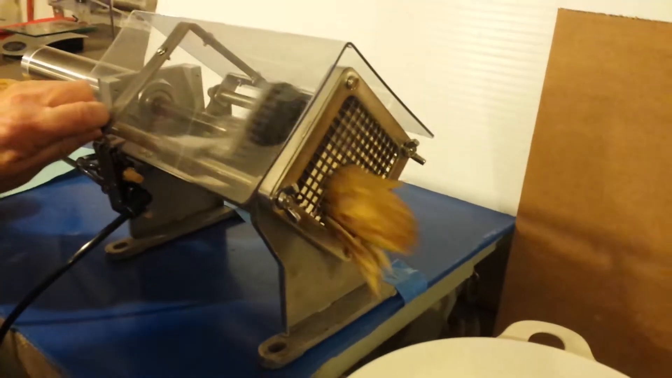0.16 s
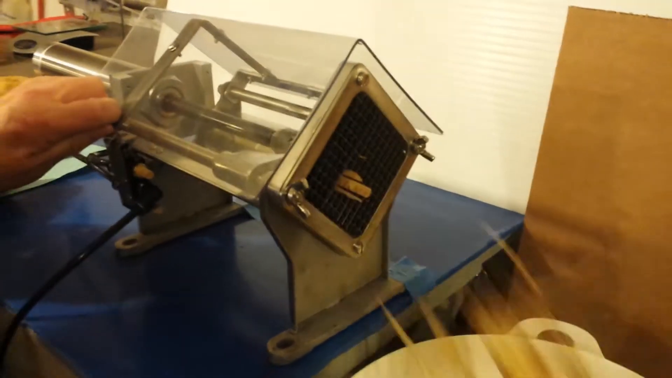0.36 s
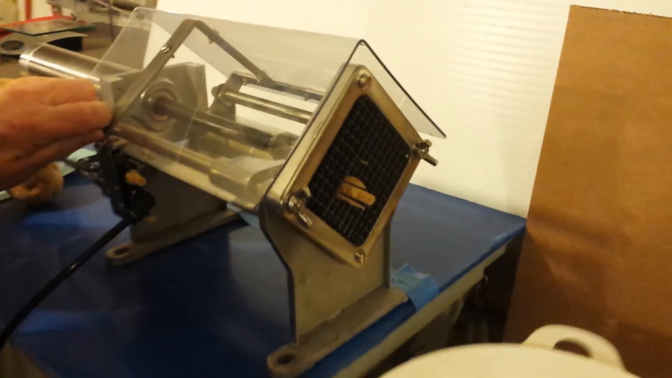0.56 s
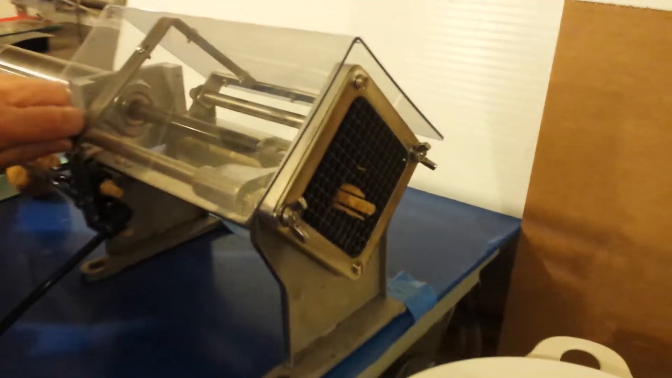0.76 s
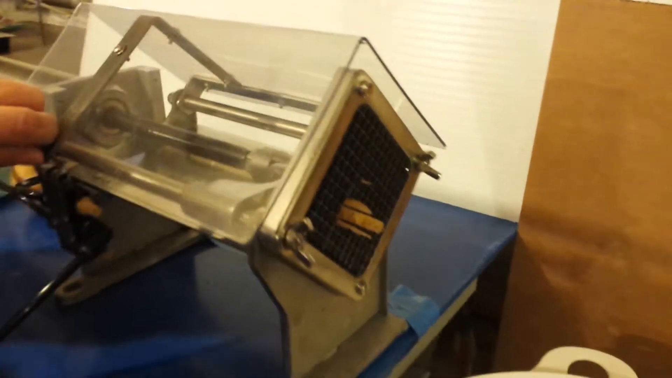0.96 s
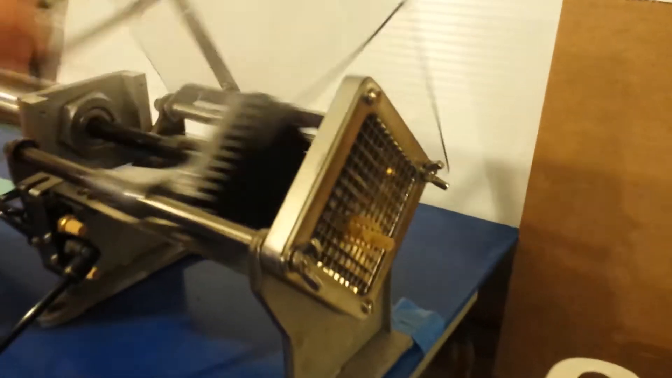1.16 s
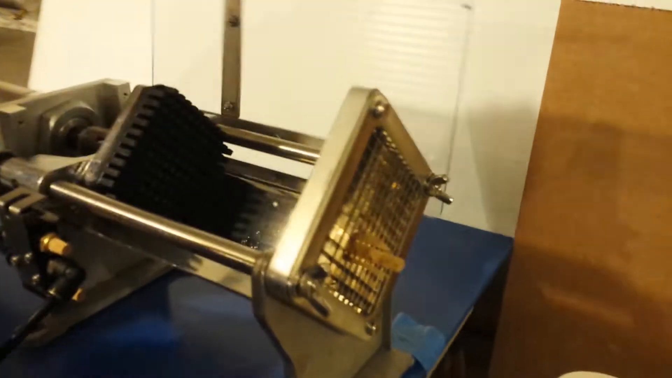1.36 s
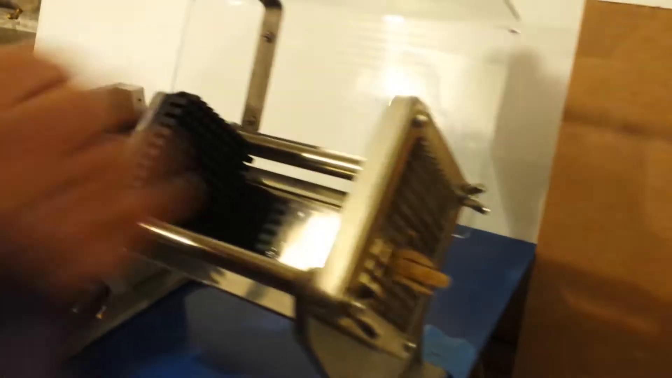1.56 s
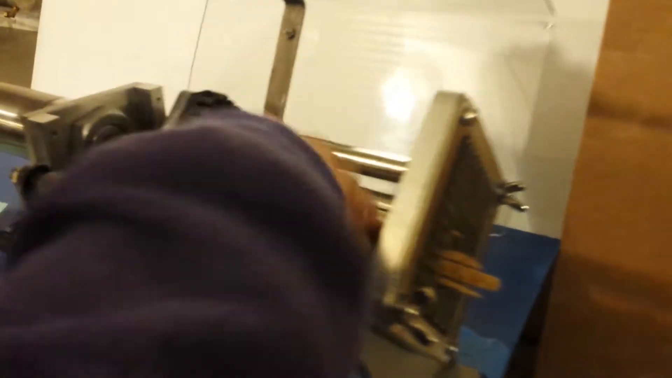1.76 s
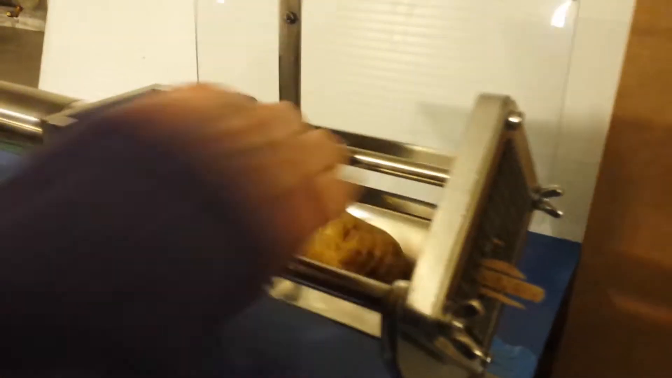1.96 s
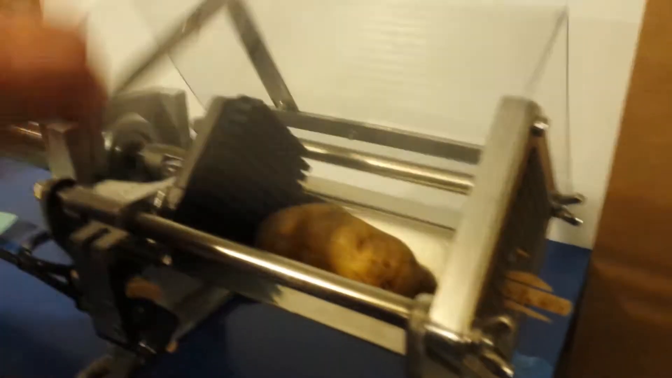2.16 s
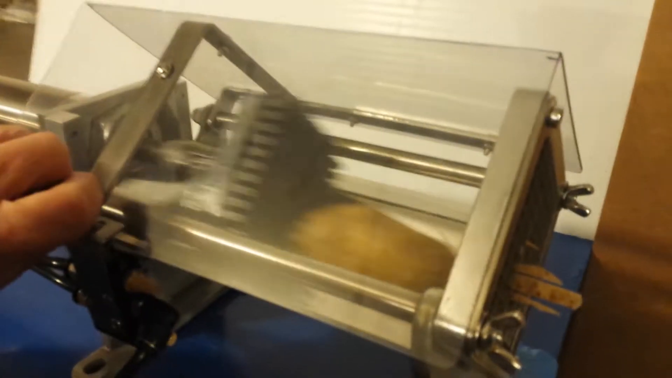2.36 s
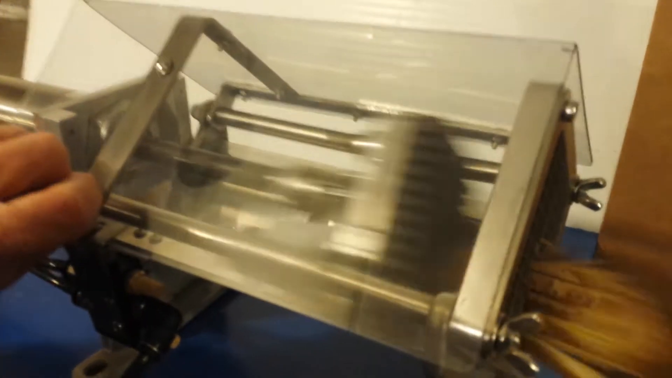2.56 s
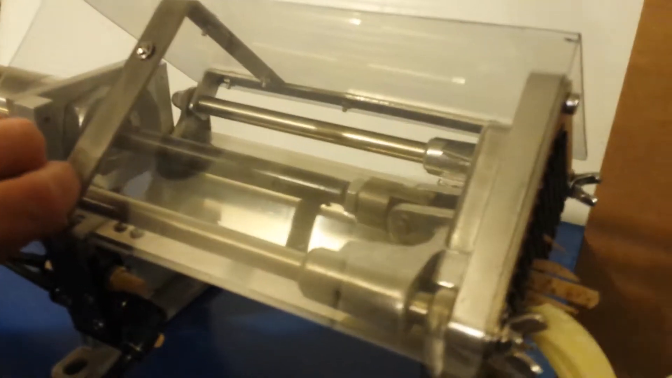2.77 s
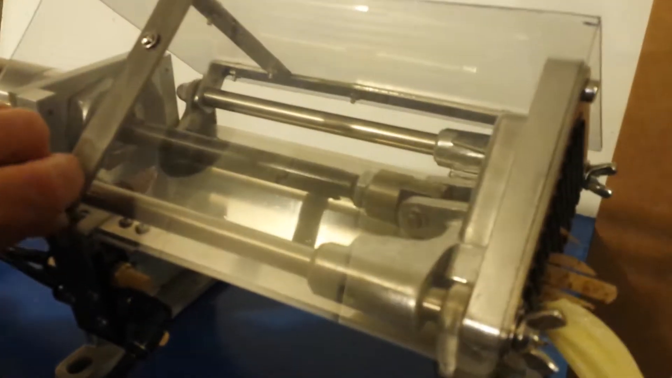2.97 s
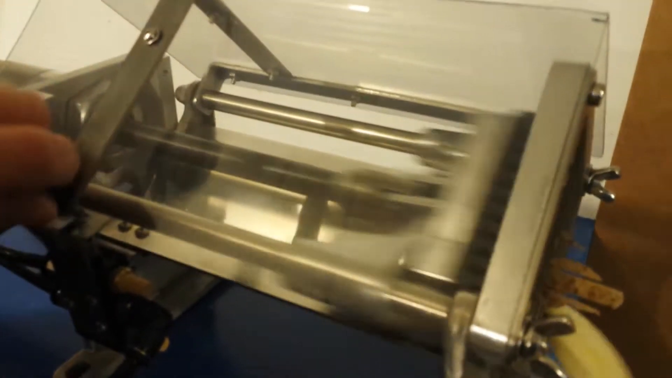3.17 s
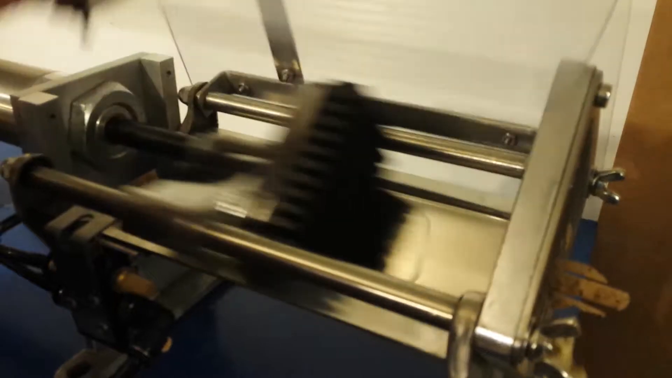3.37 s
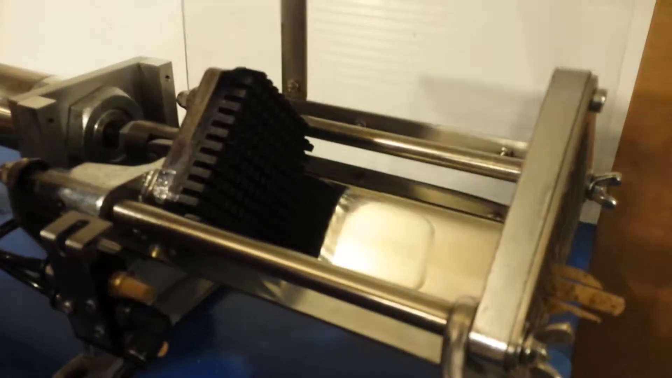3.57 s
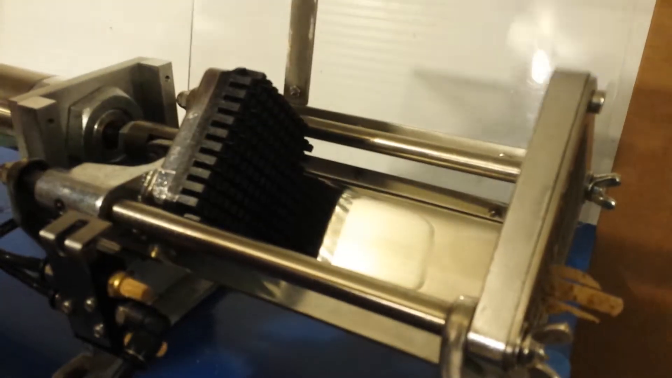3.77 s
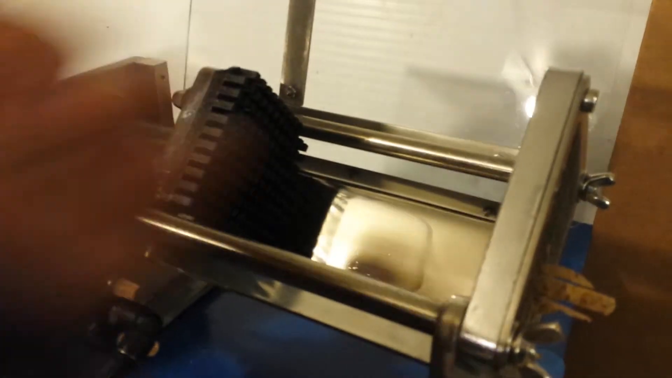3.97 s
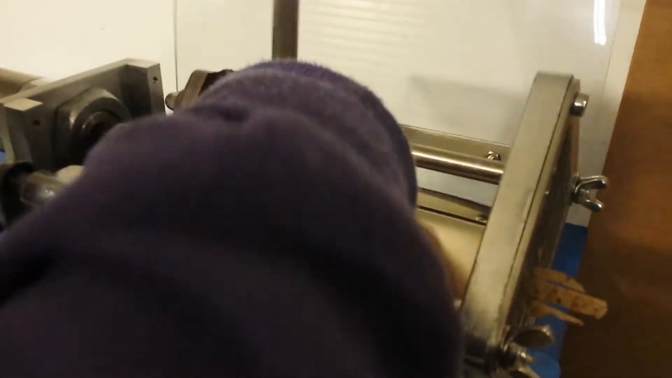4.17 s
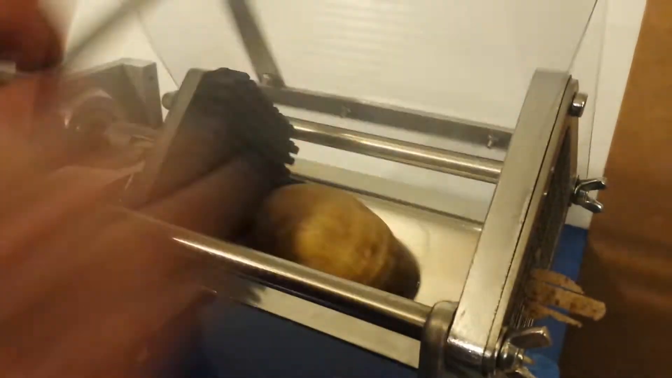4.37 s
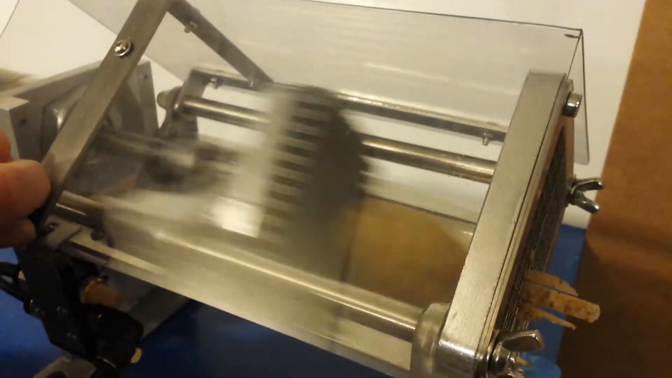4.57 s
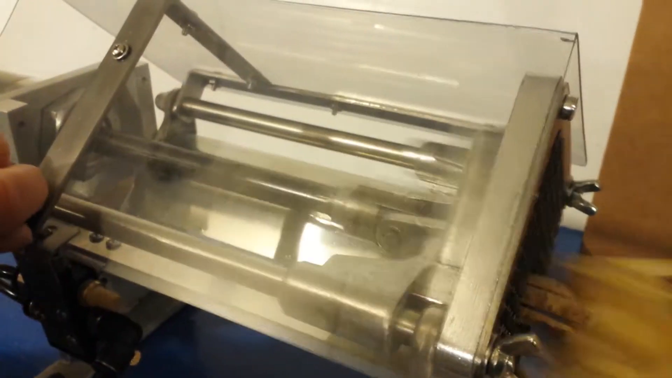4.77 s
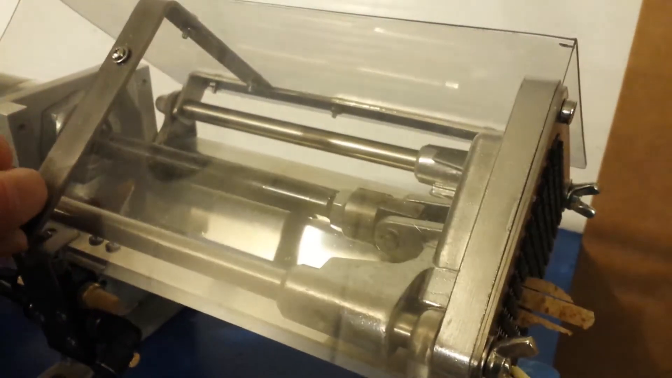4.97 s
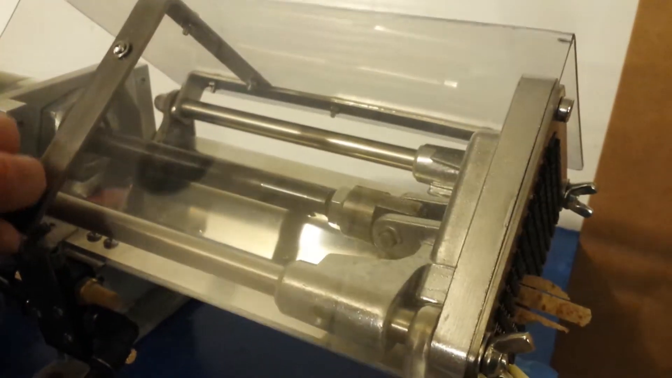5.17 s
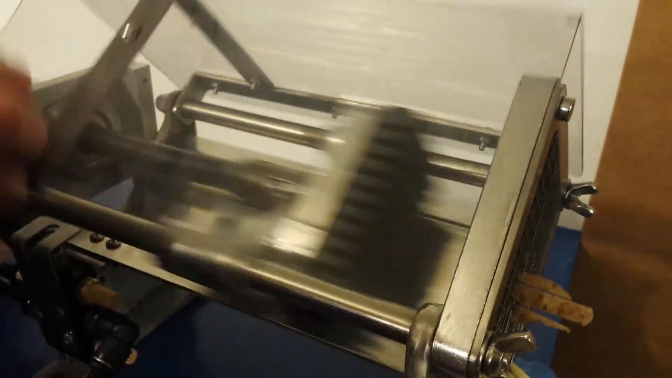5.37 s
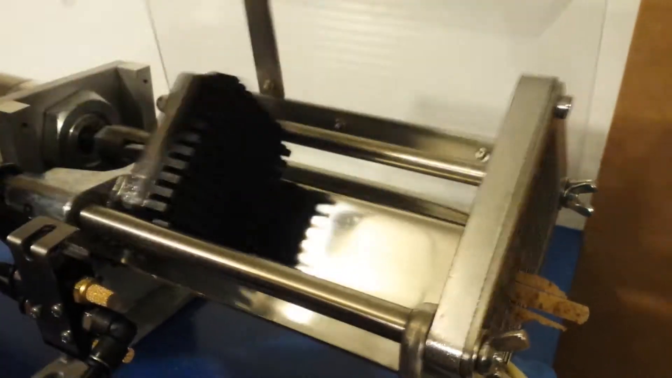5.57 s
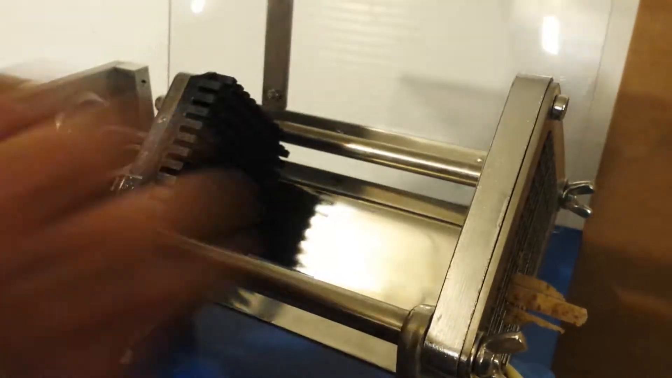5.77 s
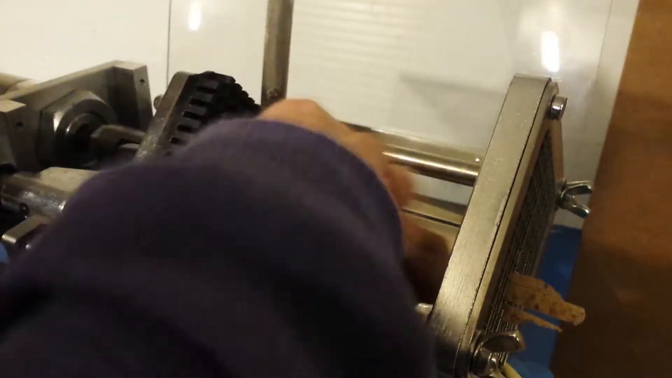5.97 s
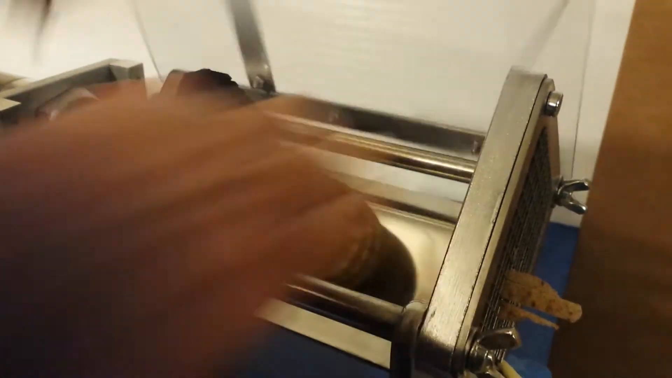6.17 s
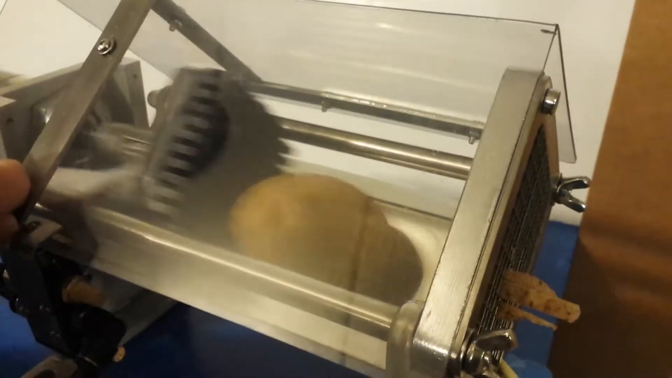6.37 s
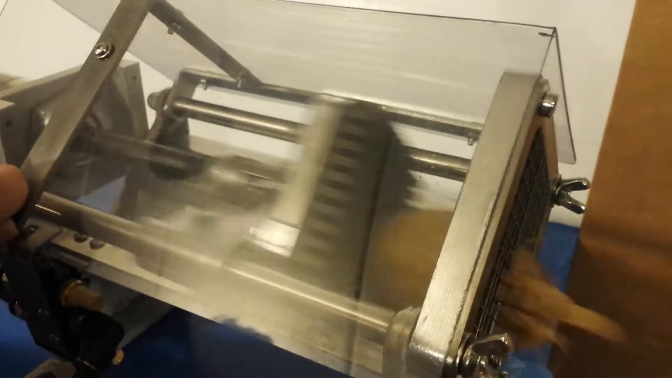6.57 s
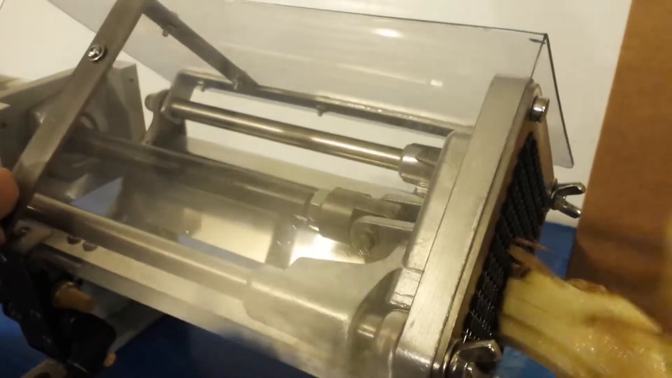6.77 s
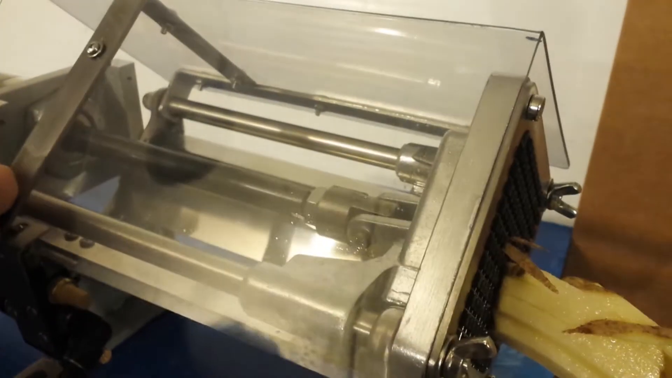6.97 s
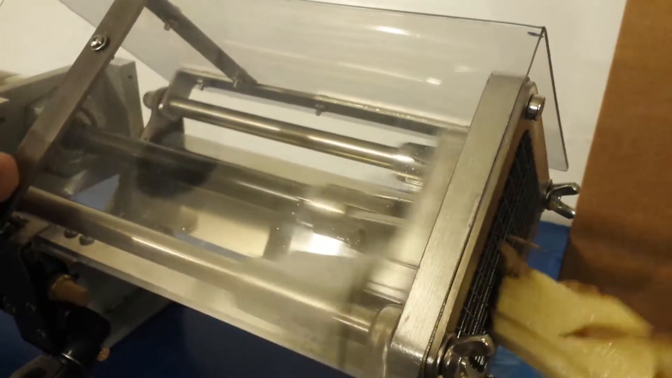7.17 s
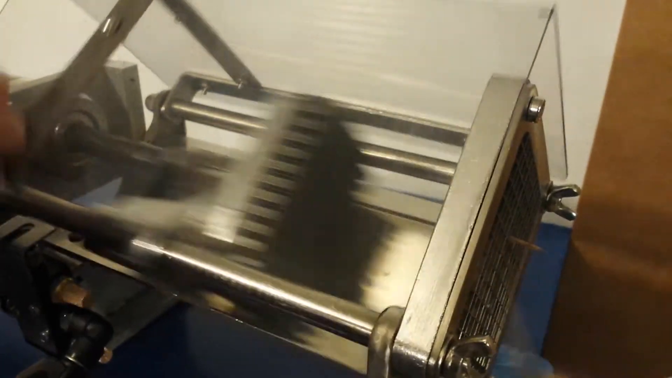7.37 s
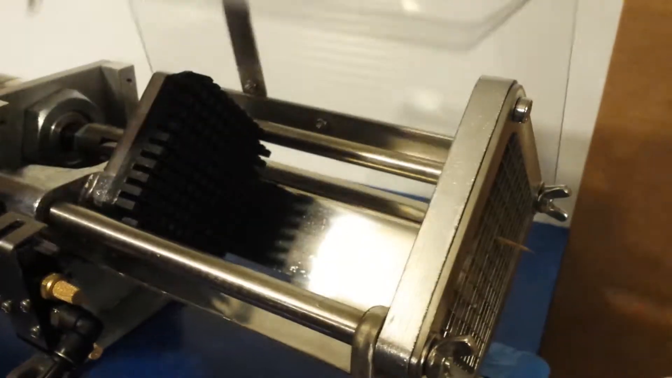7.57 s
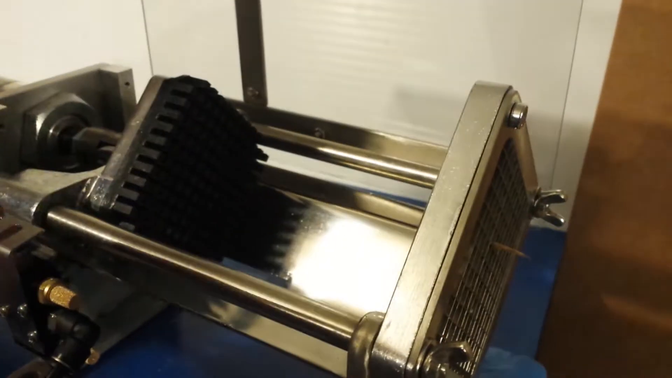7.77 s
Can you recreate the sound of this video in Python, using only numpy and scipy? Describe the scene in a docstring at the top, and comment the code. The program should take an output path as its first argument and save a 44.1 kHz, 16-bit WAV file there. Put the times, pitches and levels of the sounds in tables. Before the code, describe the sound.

Pairs of sharp air hisses and steel slams come from a pneumatic potato cutter, with light lid claps and fries plopping into a bucket.

```python
"""An air-powered fry cutter runs four cycles on a workbench, close by in a small humming room.
Air rushes from one exhaust port as the ram pushes a potato through the cutting grid, and from the
other as it returns. Each stroke ends in a slam that thumps the bench and rings the steel frame.
Fries plop into a plastic bucket, the next potato is laid in the steel trough and the lid claps shut."""
import sys
import numpy as np
from scipy import signal
from scipy.fft import rfft, irfft, next_fast_len
from scipy.io import wavfile
from scipy.ndimage import uniform_filter1d

SR = 44100
rng = np.random.default_rng(int(sys.argv[2]) if len(sys.argv) > 2 else 0)


def wav_record(signal):
    """Record a signal, one row per channel, as 16-bit PCM in the file named by sys.argv[1]."""
    frames = np.transpose(np.atleast_2d(signal))
    bounded = np.clip(frames, -1, 1)
    # unit amplitude maps onto the largest positive 16-bit level
    quanta = np.round(bounded * 32767).astype(np.int16)
    wavfile.write(sys.argv[1], SR, quanta)


N = 345303
OVERRUN_S = .005  # air keeps flowing this long after a slam

# The ram's pushes. Each row: valve opening and slam in seconds, hiss and slam levels in dB,
# the slam's t60 (seconds to fade by 60 dB), bench thump in dB.
PUSHES = [(-.03, 0.333, -15.5, -8, 0.22, -42.5), (2.360, 2.713, -12, -4.5, 0.087, -37),
          (4.490, 4.838, -11.5, -4, .09, -37), (6.403, 6.766, -11.5, -7.5, 0.1, -17.5)]
# The forward port's colour (how strong each frequency is), from the front and from beside it.
# Each row: frequency in Hz, left level in dB, right level in dB.
PUSH_FRONT = [(200, -45.5, -36.5), (1198, -29, -26.5), (1610, -20.5, -25), (1877, -24, -20.5),
              (3400, -14.5, -21.5), (3750, -9.5, -10.5), (5700, -9.5, -8), (6160, 2, -5), (9900, -14, -2.5),
              (12000, -14.5, -15), (12400, -25.5, -8.5), (13600, -18.5, -15), (15100, -30.5, -15.5)]
PUSH_BESIDE = [(200, -37, -32), (1260, -29.5, -30), (2210, -25, -18), (2650, -17.5, -19.5),
               (3730, -9, -18.5), (4920, -13.5, -1), (5860, -0.5, -13.5), (6230, 2.5, -2.5),
               (7400, -7, -9.5), (8600, -7.5, -4.5), (9240, -30, -1), (10200, -10, -15),
               (11600, -25.5, -6.5), (11800, -16, -13), (14800, -17.5, -16.5), (15100, -34, -13)]
# The slam on the grid. Each row: frequency in Hz, level in dB.
GRID_COLOUR = [(100, -17), (450, -7), (700, -8.5), (900, -7), (1100, -3.5), (1300, -6), (1600, -4),
               (2200, 0), (3400, -1.5), (4600, 2), (6600, 7), (9000, -3.5), (15000, -21)]
def forward_strokes():
    """The ram jerks off, air rushes from the forward port, and the ram slams into the grid."""
    ring_db, sag_db = -21.5, -0.7  # the hiss sinks as the potato brakes the ram
    flows = [(opens, hits + OVERRUN_S, db) for opens, hits, db, *_ in PUSHES]
    slams = [(hits, db, t60, thump_db, ring_db) for _, hits, _, db, t60, thump_db in PUSHES]
    air = exhaust(flows, PUSH_FRONT, PUSH_BESIDE, lag_ms=0.074,
                  opening_s=0.0045, vent_t60=0.14, flutter_db=0.75, change_db=sag_db)
    grid = blows(slams, GRID_COLOUR, hold_s=0.0028, thump_hz=134, thump_t60=0.074, contact_hz=9000)
    return air + grid + jerks([opens for opens, *_ in PUSHES], db=-33.5)


# The ram's returns. Each row: valve opening in seconds, then hiss, slam, thump and ring in dB.
RETURNS = [(.997, -13.5, -7, -32.5, -29), (3.148, -12, -5.5, -23, -35), (5.241, -12.5, -5, -27.5, -24.5),
           (7.185, -12.5, -5.5, -27, -26.5)]
# The return port, from the front and from beside it. Each row: frequency in Hz, left dB, right dB.
RETURN_FRONT = [(200.2, -40, -37), (1200, -32, -26.5), (1600, -26, -26), (2500, -24, -19.5),
                (3500, -8, -15), (4970, -9, -2.5), (6150, -1, -14), (7800, -10.5, -2), (9400, -8.5, -6.5),
                (11060, -14, -13), (11600, -19, -4.5), (14800, -17, -19), (15010, -44.5, -8.5)]
RETURN_BESIDE = [(200, -36.5, -34.5), (1212, -34.5, -31.5), (1910, -25, -26.5), (2180, -28, -23),
                 (3440, -16.5, -26.5), (3660, -5, -8), (4740, -11.5, -12), (5300, -12.5, -11),
                 (6150, 0.5, -9.5), (7200, -13.5, -7), (7660, -11.5, -5.5), (9500, -15, -8),
                 (10300, -11.5, -14), (12100, -28, -10.5), (13600, -15, -15.5), (15100, -34, -16.5)]
# The slam on the end cap. Each row: frequency in Hz, level in dB.
CAP_COLOUR = [(100, -22), (500, -18.5), (850, -17.5), (1300, -13.5), (1500, -12), (2400, -15), (2900, -6),
              (3400, -13.5), (4000, -1), (4600, 2), (5600, -9), (7500, -12), (10000, -13.5), (15000, -27.5)]
def return_strokes():
    """Air seeps, then rushes from the return port until the piston slams into the end cap."""
    travel_s, slam_t60 = .386, 0.089  # with no load, the trip always takes the same time
    seep_s, seep_db = 0.014, -43.5  # just before the valve opens fully
    openings = [s for s, *_ in RETURNS]
    seeps = [(s - seep_s, s, seep_db) for s in openings]
    flows = [(s, s + travel_s + OVERRUN_S, db) for s, db, *_ in RETURNS]
    slams = [(s + travel_s, db, slam_t60, thump_db, ring_db) for s, _, db, thump_db, ring_db in RETURNS]
    port = dict(front=RETURN_FRONT, beside=RETURN_BESIDE, lag_ms=-0.17)
    air = exhaust(seeps, **port, opening_s=0.017, vent_t60=.03, flutter_db=5.0, change_db=8.5)
    air += exhaust(flows, **port, opening_s=0.0076, vent_t60=0.12, flutter_db=0.6)
    cap = blows(slams, CAP_COLOUR, hold_s=0.0055, thump_hz=143, thump_t60=0.038, contact_hz=9000)
    return air + cap + jerks(openings, db=-40.5)


# How alike a jet sounds in both ears. Each row: frequency in Hz, shared part from 0 to 1.
JET_LIKENESS = [(100, .4), (500, 0.89), (1200, .5), (2300, .2), (3300, .9), (4500, 0.5), (6500, 0.26),
                (8000, 0.4), (15000, 0.38)]
LISTENER_MOVES_S = 2  # later jets are heard from beside the machine
def exhaust(strokes, front, beside, lag_ms, opening_s, vent_t60, flutter_db, change_db=0):
    """Swirling air hisses from each start to its stop, then fades as the cylinder empties."""
    out = np.zeros((2, N))
    for start, stop, db in strokes:
        length = max(stop - start, .002)
        t = clock(length + .3)
        flow = np.minimum(t / opening_s, 1) ** 1.3 * fade(np.maximum(t - length, 0), vent_t60)
        eddies = unit(uniform_filter1d(rng.standard_normal(len(t)), size=400))
        colour = front if start < LISTENER_MOVES_S else beside
        jet = near_echoes(noise(len(t), colour, lag_ms, JET_LIKENESS))
        level_db = db + change_db * np.minimum(t / length, 1) + flutter_db * eddies
        add(out, start, jet * flow * undb(level_db))
    return out


# The ram's jerk. Each row: frequency in Hz, level in dB.
JERK_COLOUR = [(150, -12), (450, -6), (700, -0.5), (1100, -12.5), (3000, -15), (15000, -36.5)]
def jerks(openings, db):
    """The ram gives a dull jerk as the pressure reaches it, just after the valve opens."""
    delay_s, t60, thump_db, ring_db = 0.0068, 0.066, db - 4, db - 3.5
    rows = [(s + delay_s, db, t60, thump_db, ring_db) for s in openings]
    return blows(rows, JERK_COLOUR, hold_s=0.012, thump_hz=170, thump_t60=0.13, contact_hz=1000)


def blows(rows, colour, hold_s, thump_hz, thump_t60, contact_hz):
    """Each blow cracks, thumps the bench and rings the frame."""
    out = np.zeros((2, N))
    bench = hump(thump_hz, skirt_db=-9.0)
    for s, db, t60, thump_db, ring_db in rows:
        add(out, s, undb(db) * burst(colour, t60, hold_s, rise_s=0.00089))
        add(out, s, undb(thump_db) * burst(bench, thump_t60, hold_s=0.0017, rise_s=0.0022))
        add(out, s, undb(ring_db) * frame_ring(contact_hz))
    return out


# The tones of the steel frame and grid. Each row: frequency in Hz, level in dB, t60 in seconds.
FRAME_TONES = [(290, -9, 0.24), (354, -13, 0.22), (552, -5.5, 0.28), (633.4, -1, 0.29), (680, -5.5, 0.19),
               (718, 0, .21), (839, 0, 0.15), (1100, -2, .08), (1575, -4, 0.091), (1694, -3, 0.16),
               (1860, 2.5, .15), (2150, -0.5, 0.24), (2210, -7.5, 0.3), (2630, -4.5, 0.12),
               (3050, -7.5, 0.2), (4100, -3, .24), (4400, -1, .18), (4466, 3.5, .2), (5240, -5.5, .22),
               (6368, -7, .18), (6600, -7, .22)]
def frame_ring(contact_hz):
    """Each blow rings a new mix of the frame's tones; a soft contact weakens those above contact_hz."""
    t = clock(.32)
    hz, db, t60 = np.array(FRAME_TONES).T[:, :, None]
    strength = undb(db) / (1 + (hz / contact_hz) ** 4)
    detuned_hz = hz * (1 + .003 * rng.standard_normal(hz.shape))
    phase = 2 * np.pi * (detuned_hz * t + rng.random(hz.shape))
    tones = strength * fade(t, t60) * np.exp(1j * phase)
    ear_phase = rng.standard_normal((2, len(hz))) * np.minimum(hz.T / 1500, 2)
    ear_mix = undb(2 * rng.standard_normal((2, len(hz)))) * np.exp(1j * ear_phase)
    return (ear_mix @ tones).imag / np.linalg.norm(strength)


# The lid shuts. Each row: start in seconds, clap and thump in dB, seconds until the bounce,
# the bounce's level change in dB.
LID_CLAPS = [(.660, -25.5, -53, 0.015, -17.5), (2.296, -18.5, -34, 0.019, -6),
             (4.487, -21.5, -29.5, .008, 3.5), (6.333, -19, -36, 0.014, -4)]
# The lid's clap. Each row: frequency in Hz, level in dB.
LID_COLOUR = [(100, -13), (400, -5.5), (750, 3), (1200, -7), (2000, 1.5), (3500, -5), (6500, 0),
              (9000, -16.5), (15000, -34)]
# Spits of air from the forward port. Each row: start and stop in seconds, level in dB.
SPITS = [(6.342, 6.347, -10), (6.356, 6.373, -16.5)]
def lid():
    """The lid claps shut and bounces once; the last time, it bumps the valve and air spits out."""
    t60, ring_offset_db = .065, -17
    rows = []
    for s, db, thump_db, bounce_s, bounce_db in LID_CLAPS:
        for late_s, shift_db in [(0, 0), (bounce_s, bounce_db)]:
            clap_db = db + shift_db
            rows.append((s + late_s, clap_db, t60, thump_db + shift_db, clap_db + ring_offset_db))
    claps = blows(rows, LID_COLOUR, hold_s=0.0028, thump_hz=175, thump_t60=0.13, contact_hz=2210)
    return claps + exhaust(SPITS, PUSH_FRONT, PUSH_BESIDE, lag_ms=0.074,
                           opening_s=0.0022, vent_t60=0.013, flutter_db=1.5, change_db=-4.0)


# Cracks at the blades. Each row: start in seconds, level in dB, frame ring in dB.
CRUNCHES = [(6.696, -23, -38), (6.720, -21.5, -29), (6.733, -28.5, -36), (6.760, -26, -28),
            (6.783, -29, -29), (6.801, -33, -28.5)]
# One crack. Each row: frequency in Hz, level in dB.
CRUNCH_COLOUR = [(120, -13), (330, -10), (450, -7), (660, 3), (820, -2), (1000, -10), (1300, -2.5),
                 (3000, -5), (6000, -6.5), (15000, -35)]
def hard_potato():
    """A hard potato cracks through the blades and shakes the grid."""
    out = np.zeros((2, N))
    for s, db, ring_db in CRUNCHES:
        add(out, s, undb(db) * burst(CRUNCH_COLOUR, t60=0.15))
        add(out, s, undb(ring_db) * frame_ring(contact_hz=900))
    return out


# Fries land. Each row: start in seconds, level in dB, pitch in Hz.
PLOPS = [(.519, -26.5, 1750), (.535, -25, 1500), (.544, -25.5, 1750), (2.899, -44.5, 1360),
         (2.924, -39.5, 1430), (2.975, -36, 1600), (3.932, -49.5, 1460), (5.024, -36, 1470),
         (5.088, -39.5, 1410), (6.989, -30, 1455), (7.006, -37.5, 1420), (7.025, -39, 1200)]
# One plop. Each row: multiple of its pitch, level in dB.
PLOP_COLOUR = [(.12, -20), (.3, -12.5), (.55, -25), (.82, -5.5), (1, -4), (1.22, -7.5), (1.7, -19.5),
               (8, -41)]
# Loose fries tick. Each row: start in seconds, level in dB.
TICKS = [(.506, -25.5), (.521, -27.5), (.535, -28), (.545, -34.5), (2.924, -38), (2.98, -41.5),
         (5.04, -37.5), (5.048, -34), (5.075, -40), (7.049, -43)]
# One tick. Each row: frequency in Hz, level in dB.
TICK_COLOUR = [(300, -9.5), (2000, -13.5), (4000, -9.5), (6500, 0), (9000, -10), (15000, -27)]
def fries():
    """Fries hit the bucket with short hollow plops and wet ticks."""
    out = np.zeros((2, N))
    pan_db = np.array([[0.75], [-0.75]])  # a little to the left
    for s, db, hz in PLOPS:
        colour = [(hz * multiple, gain_db) for multiple, gain_db in PLOP_COLOUR]
        add(out, s, undb(db + pan_db) * burst(colour, t60=0.046, hold_s=0.003))
    for s, db in TICKS:
        add(out, s, undb(db) * burst(TICK_COLOUR, t60=0.052, hold_s=0.00082, rise_s=0.00044))
    return out


# Knocks in the trough. Each row: start in seconds, level in dB.
KNOCKS = [(1.757, -42.5), (1.843, -52), (1.856, -42.5), (4.211, -41.5), (4.257, -38), (6.022, -42),
          (6.039, -46.5), (6.094, -31)]
# One knock. Each row: frequency in Hz, level in dB.
KNOCK_COLOUR = [(150, -9), (600, 6), (1100, -8), (1800, 3), (2600, -7.5), (4000, -2.5), (6500, -5),
                (9000, -8), (15000, -37)]
def trough(t60=0.06, thump_db=-62, ring_db=-49):
    """The next potato knocks about as it is laid in the steel trough."""
    rows = [(s, db, t60, thump_db, ring_db) for s, db in KNOCKS]
    return blows(rows, KNOCK_COLOUR, hold_s=0.0024, thump_hz=220, thump_t60=0.072, contact_hz=5900)


# Soft rubs. Each row: middle and length in seconds, level in dB, strongest frequency in Hz.
BRUSHES = [(0.735, .3, -49, 470), (3.919, 0.06, -51, 191), (4.151, 0.078, -56.5, 900),
           (4.232, 0.078, -46.5, 885), (4.411, 0.048, -41.5, 5170), (4.423, .08, -43.5, 346)]
def brushes():
    """Sleeve, hand and settling fries rub on machine and bucket in soft swells."""
    out = np.zeros((2, N))
    for s, length, db, hz in BRUSHES:
        swell = np.hanning(int(length * SR))
        add(out, s - length / 2, undb(db) * swell * noise(len(swell), hump(hz, skirt_db=-13)))
    return out


def near_echoes(x, strength=0.45, count=12):
    """Quick echoes off lid, frame and bench colour the sound differently for each ear."""
    lags = rng.integers(130, 520, (2, count))  # samples
    echoes = np.array([sum(np.roll(ear, lag) for lag in row) for ear, row in zip(x, lags)])
    return unit(x + strength * unit(echoes))


# The room's echo. Each row: frequency in Hz, level in dB, t60 in seconds.
ROOM_BANDS = [(150, -14.5, 0.65), (689, -9, 0.36), (1980, -10.5, 0.47), (4300, -17, 0.41),
              (6950, -15.5, 0.37), (9800, -18.5, 0.13), (15000, -25, .2)]
def room_echo(x, build_s=0.0054):
    """Echoes from bench and walls blur together; the treble dies first."""
    t = clock(.7)
    hz = np.fft.rfftfreq(len(t), 1 / SR)
    white = rfft(rng.standard_normal((2, len(t))))
    centres = np.log([row[0] for row in ROOM_BANDS])
    echo = 0
    for share, (_, db, t60) in zip(np.eye(len(ROOM_BANDS)), ROOM_BANDS):
        band = irfft(white * np.interp(np.log(np.maximum(hz, 1)), centres, share), len(t))
        tail = fade(t, t60) * np.minimum(t / build_s, 1) ** 2
        echo = echo + undb(db) * band * tail / np.linalg.norm(tail)
    return signal.fftconvolve(x, echo, axes=1)[:, :N]


# A motor's tones, then the colour of the room's noise. Each row: frequency in Hz, level in dB.
MOTOR_TONES = [(86.1, -67), (177.6, -61.5), (226.1, -67.5), (376.8, -70.5), (457.6, -74.5), (522.2, -69)]
ROOM_NOISE_COLOUR = [(18, -44.5), (30, -32.5), (69, -10.5), (234, -6), (288, -14), (355, -11.5), (472, -11),
                     (612, -21), (698, -17.5), (794, -24), (2990, -34), (3230, -31), (5030, -33),
                     (6360, -26), (15000, -48.5)]
def hum(noise_db=-53, waver_radians=0.94):
    """A motor's tones waver slowly over the room's steady noise."""
    t = np.arange(N) / SR
    out = undb(noise_db) * noise(N, ROOM_NOISE_COLOUR)
    for hz, db in MOTOR_TONES:
        drift = np.interp(t, np.linspace(0, N / SR, num=50), rng.standard_normal(50))
        phase = 2 * np.pi * hz * t + waver_radians * drift + rng.standard_normal((2, 1))
        out += np.sqrt(2) * undb(db) * np.sin(phase)
    return out


# How alike other noises sound in both ears. Each row: frequency in Hz, shared part from 0 to 1.
EAR_LIKENESS = [(100, 0.6), (500, 0.6), (1200, 0.2), (3000, 0), (7000, 0.5), (15000, .15)]
def noise(n, colour, lag_ms=0.065, likeness=EAR_LIKENESS):
    """Coloured noise: each ear has its own part, plus a shared part lag_ms later on the right."""
    size = next_fast_len(n)
    hz = np.fft.rfftfreq(size, 1 / SR)
    white = rfft(rng.standard_normal((3, size)))
    alike = np.clip(along(hz, likeness, 1), 0, 1)
    shared = white[2] * np.exp(-2j * np.pi * np.outer([0, lag_ms], hz / 1000))
    ears = np.sqrt(alike) * shared + np.sqrt(1 - alike) * white[:2]
    gains = undb([along(hz, colour, 1), along(hz, colour, -1)])
    return unit(irfft(ears * gains, size)[:, :n])


def burst(colour, t60, hold_s=0.0028, rise_s=0.00078):
    """A blow wakes many close tones: a noise that swells during contact, then dies away."""
    t = clock(.32)
    return noise(len(t), colour) * (1 - np.exp(-t / rise_s)) * fade(np.maximum(t - hold_s, 0), t60)


def hump(hz, skirt_db):
    """A colour with one broad peak, falling to skirt_db an octave away."""
    return [(hz / 8, 4 * skirt_db), (hz / 2, skirt_db), (hz, 0),
            (hz * 2, skirt_db), (hz * 8, 2 * skirt_db), (hz * 32, 4 * skirt_db)]


def along(hz, points, column):
    """Read between a table's rows, with octaves evenly spaced."""
    table = np.array(points, float).T
    return np.interp(np.log(np.maximum(hz, 1)), np.log(table[0]), table[column])


def undb(db):
    """Turn decibels into a gain."""
    return 10 ** (np.asarray(db) / 20)


def unit(x):
    """Scale to an average power of 1."""
    return x / np.sqrt(np.mean(x ** 2))


def clock(length):
    """Sample times for this many seconds."""
    return np.arange(int(length * SR)) / SR


def fade(t, t60):
    """Die away by 60 dB every t60 seconds."""
    return np.exp(-np.log(1000) * t / t60)


def add(out, s, sound):
    """Mix a sound in at s seconds, dropping what falls outside."""
    start = int(s * SR)
    a, b = max(start, 0), min(start + sound.shape[-1], N)
    out[:, a:b] += sound[..., a - start:b - start]


def scene():
    """Strokes, lid, potatoes and handling in the humming room."""
    near = forward_strokes() + return_strokes() + lid() + trough() + hard_potato() + fries() + brushes()
    return near + room_echo(near) + hum()


def record(dry):
    """Flatten the tallest peaks and cut the highest treble."""
    top_hz = 15600
    lowpass = signal.ellip(10, .2, 60, top_hz, fs=SR, output="sos")
    return signal.sosfilt(lowpass, np.clip(dry, -1, 1))


dry = scene()
out = record(dry)
wav_record(out)
```